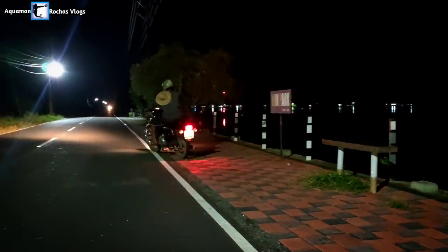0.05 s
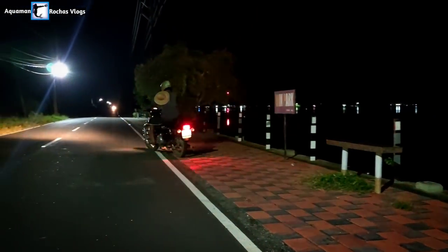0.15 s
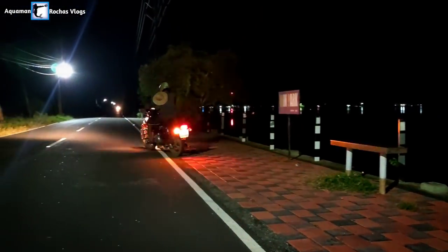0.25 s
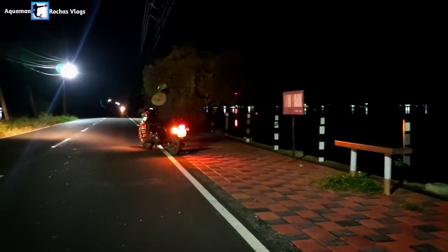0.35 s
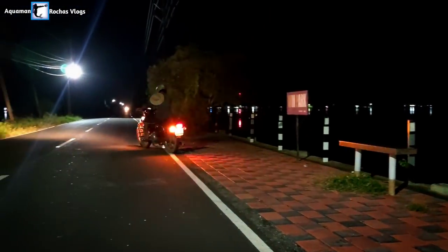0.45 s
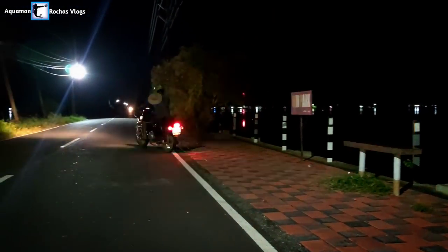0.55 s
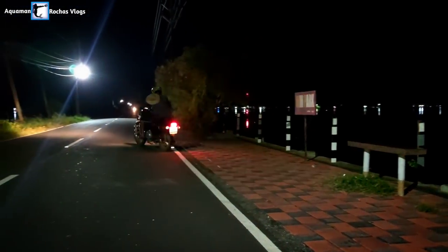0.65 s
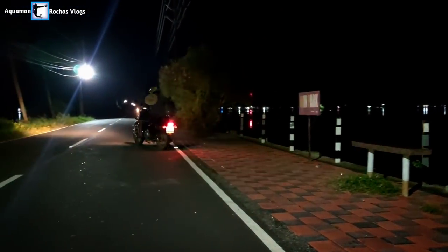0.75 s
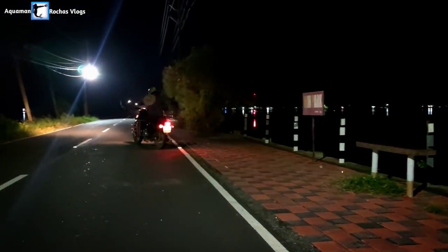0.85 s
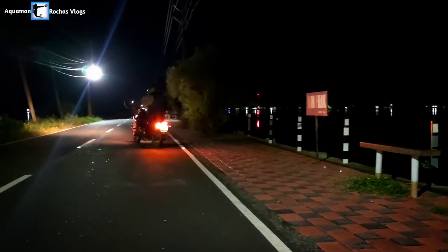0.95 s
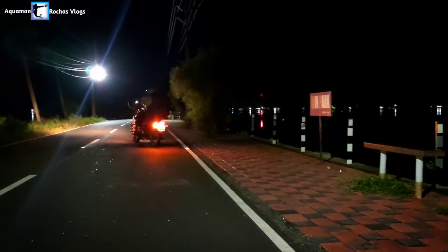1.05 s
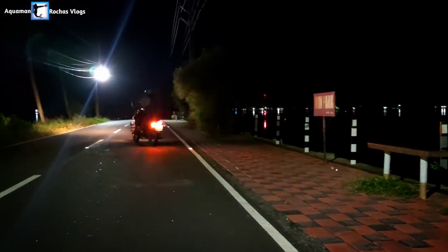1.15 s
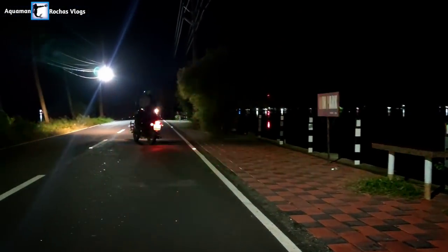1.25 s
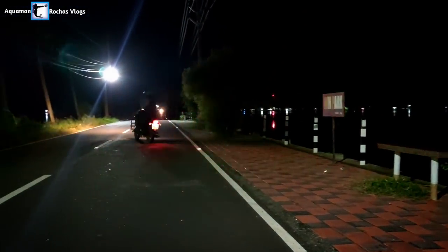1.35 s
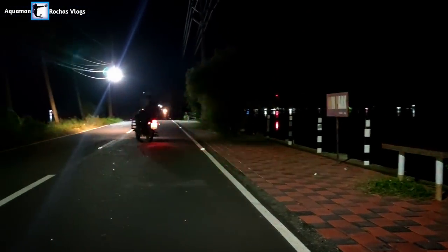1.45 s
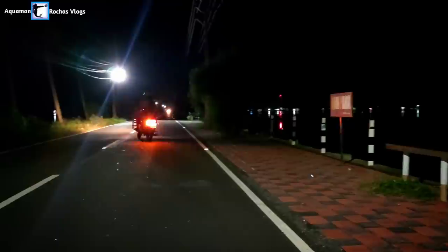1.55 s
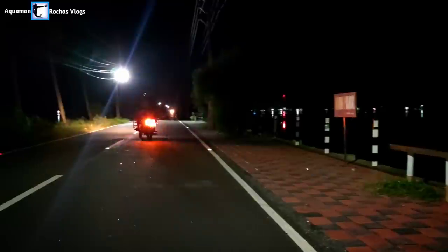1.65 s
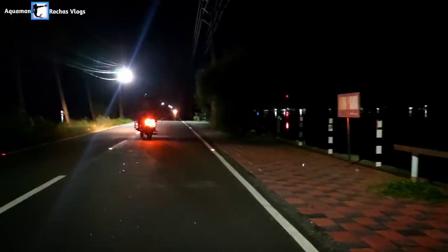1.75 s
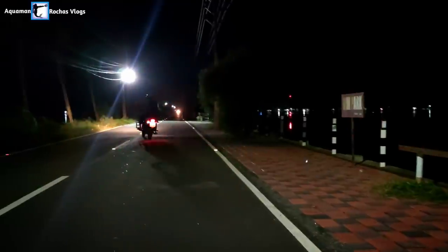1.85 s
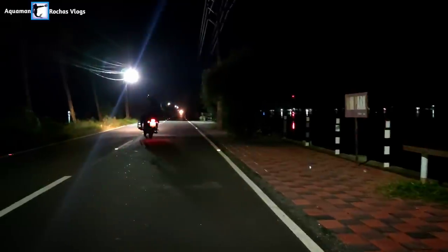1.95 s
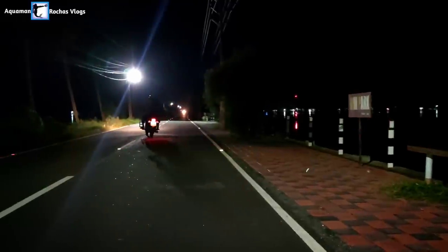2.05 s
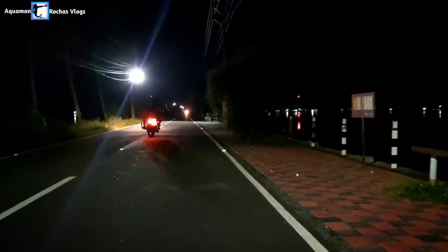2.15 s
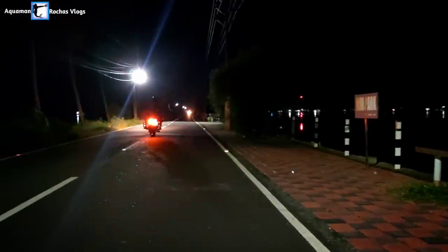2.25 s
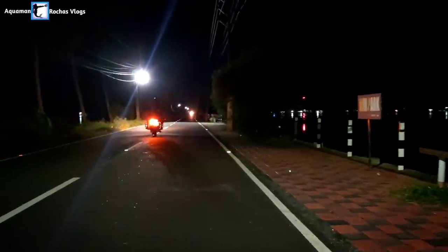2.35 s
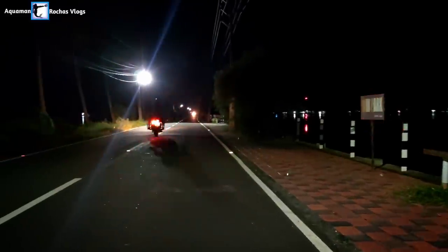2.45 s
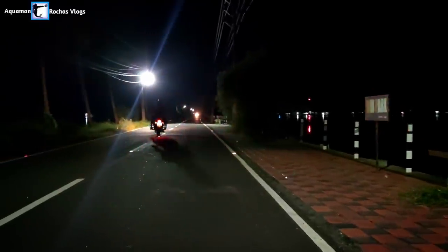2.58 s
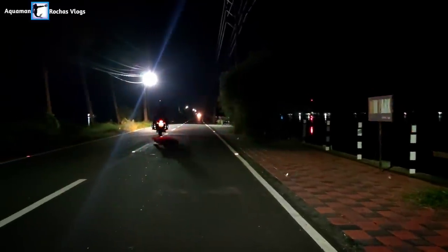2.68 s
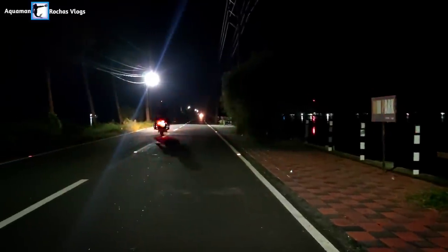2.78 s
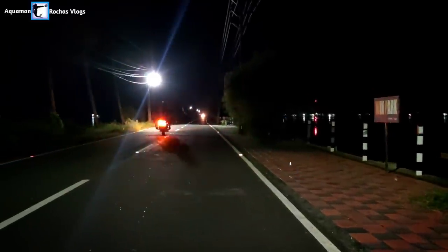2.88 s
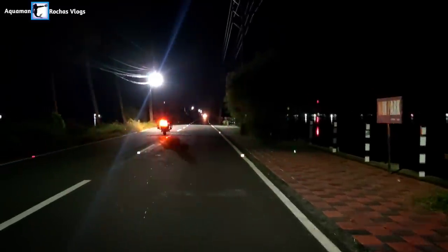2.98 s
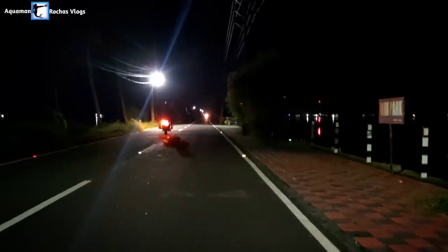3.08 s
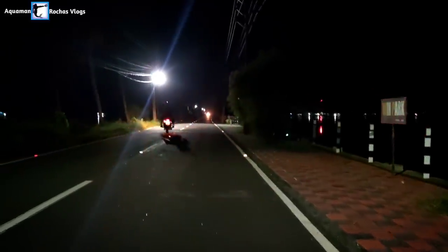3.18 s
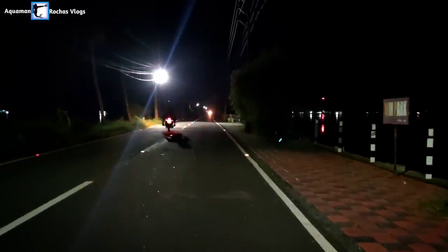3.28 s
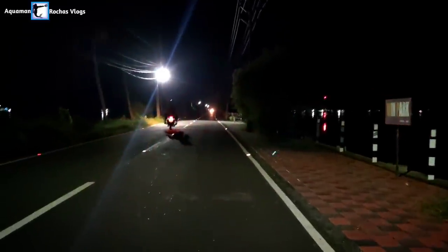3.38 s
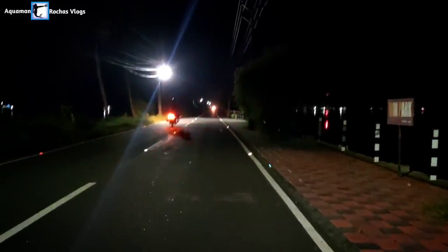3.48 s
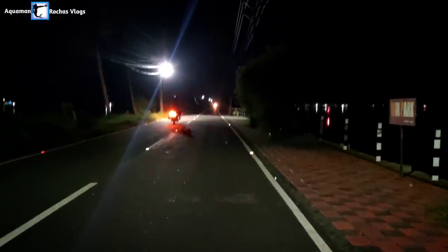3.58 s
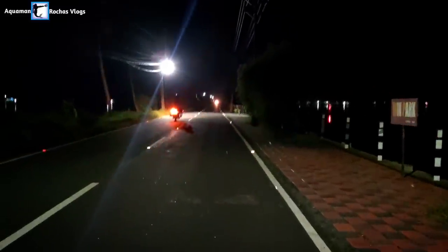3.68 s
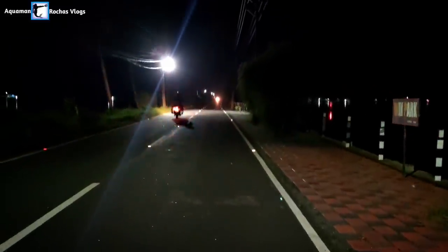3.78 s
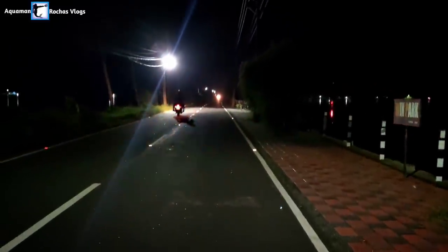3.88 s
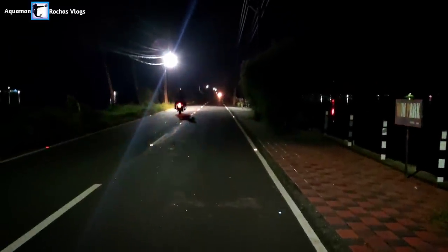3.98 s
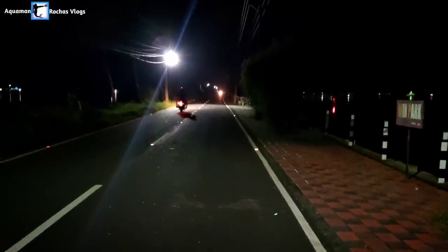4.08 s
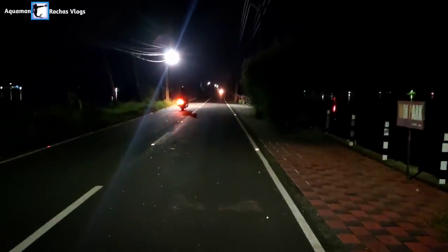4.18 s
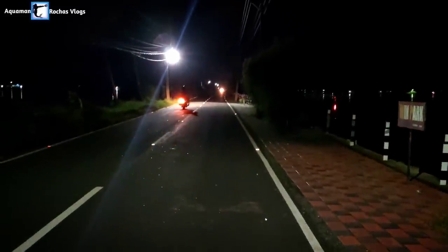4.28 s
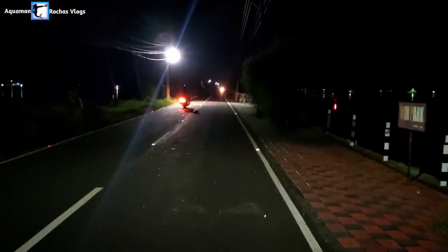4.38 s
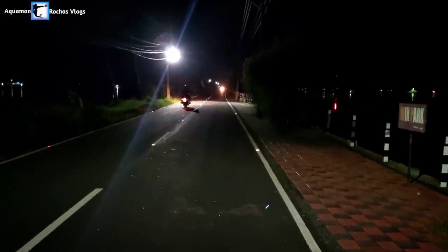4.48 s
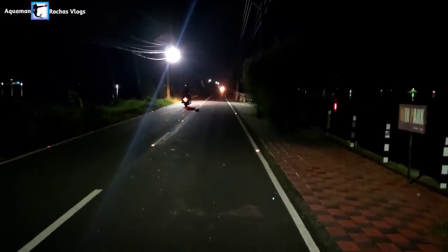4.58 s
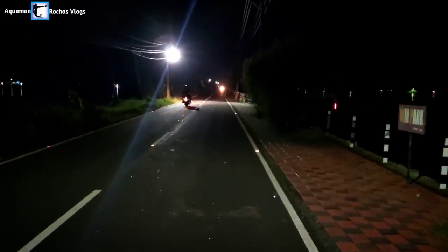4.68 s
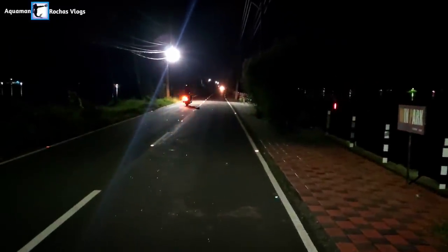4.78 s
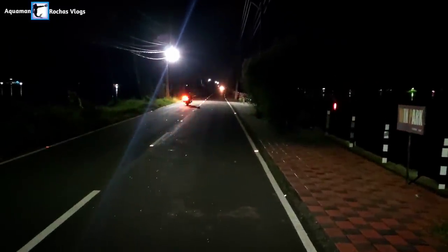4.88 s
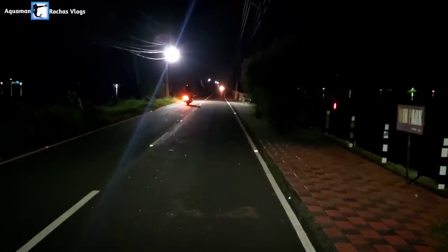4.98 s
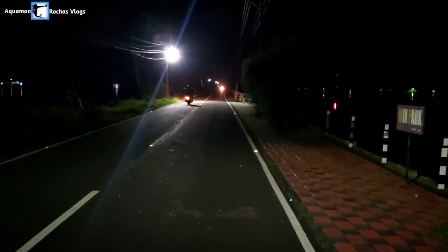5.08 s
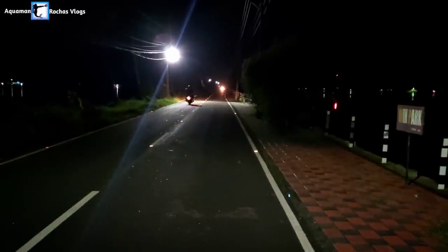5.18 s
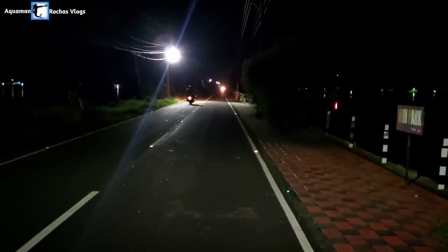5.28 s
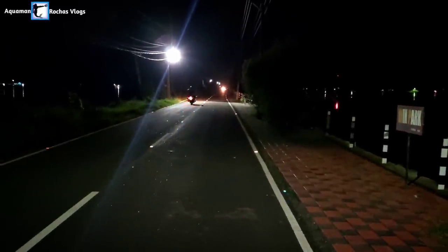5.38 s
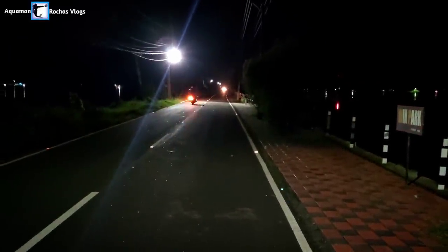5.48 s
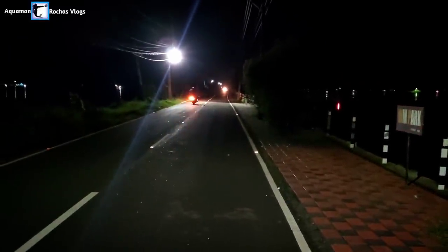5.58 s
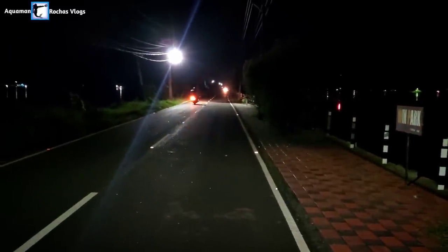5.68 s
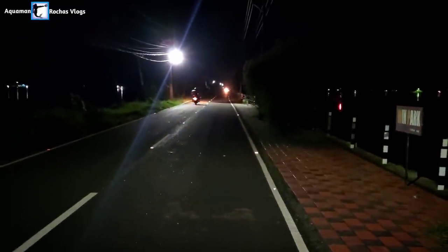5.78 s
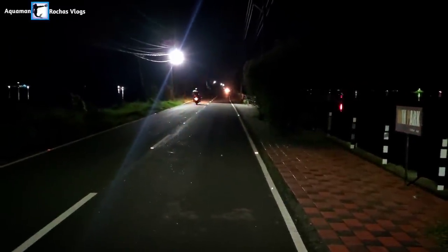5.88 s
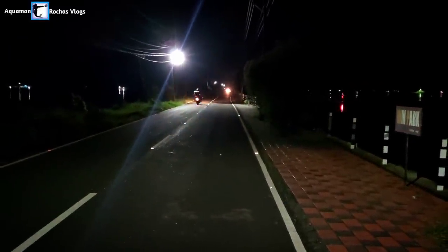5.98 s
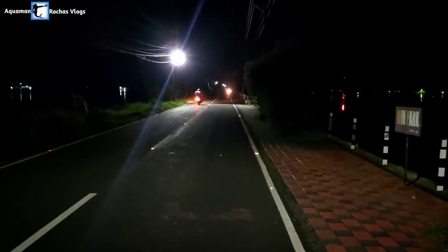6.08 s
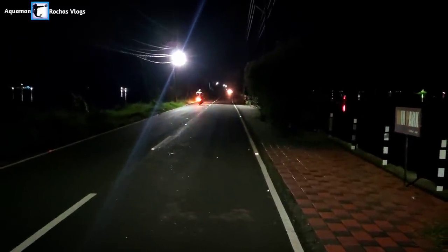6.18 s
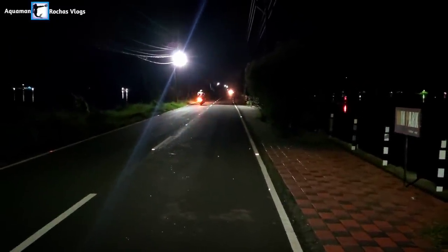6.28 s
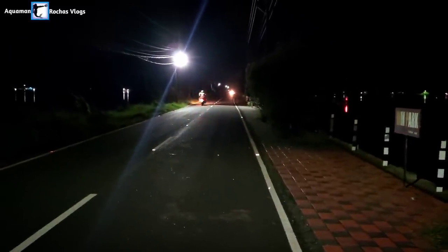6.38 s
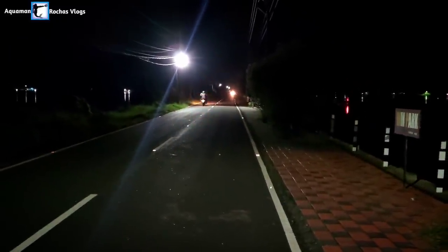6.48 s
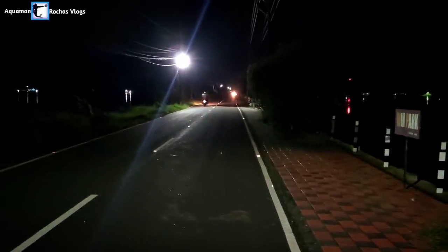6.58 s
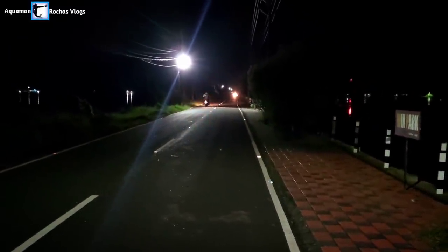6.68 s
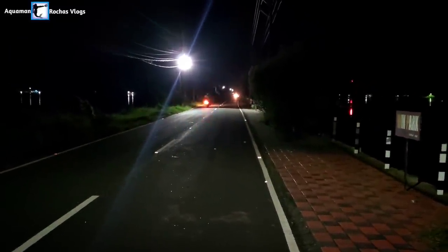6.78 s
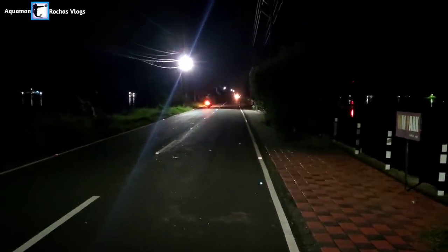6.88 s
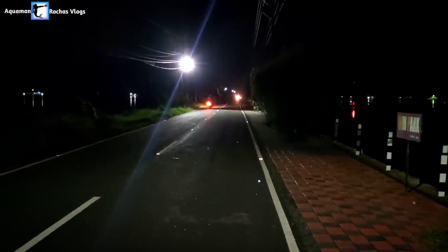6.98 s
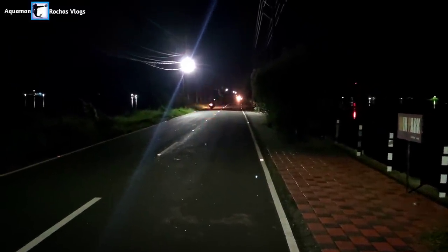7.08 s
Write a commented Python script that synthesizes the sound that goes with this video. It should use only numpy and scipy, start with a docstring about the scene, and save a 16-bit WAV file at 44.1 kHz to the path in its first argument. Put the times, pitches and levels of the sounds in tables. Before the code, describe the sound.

Crickets chirp in the night air as a motorcycle rides off with a deep, pulsing exhaust, dipping at two gear changes.

```python
"""A single-cylinder motorcycle pulls away on a night road, changes up twice and fades into the distance.
Its exhaust is a pulse train: each firing thumps the silencer, excites the pipe's resonances in a bark
and releases a chuff of turbulent gas. The sound spreads spherically and scatters from roadside trees.
Close by on the left a bush cricket chirps, one falling whistle to a wing stroke, over far insects
and a low rumble of air."""
import sys
import numpy as np
from scipy import signal
from scipy.fft import rfft, irfft
from scipy.io import wavfile

SR = 44100
rng = np.random.default_rng(int(sys.argv[2]) if len(sys.argv) > 2 else 0)


def generate_wav(signal):
    """Clip the signal to [-1, 1] and save it as 16-bit WAV at the path in sys.argv[1]."""
    frames = np.transpose(np.atleast_2d(signal))
    scaled = np.clip(frames, -1, 1) * 32767
    pcm = np.round(scaled).astype(np.int16)
    wavfile.write(sys.argv[1], SR, pcm)


N = 314874
TIME = np.arange(N) / SR

# one pull per gear: t/s, firing rate/Hz, its linear term/(Hz/s), its quadratic term/(Hz/s^2),
# clutch slip/Hz, opening time/s, throttle/1, thump/dB, bark/dB, chuff/dB, chuff swell/(dB/s)
GEAR_PULLS = [(0.0205, 12.305, 1.79, 1.8, 0, 0, .81, -10.8, -34, -26, 4),
              (2.3744, 12.485, 3.572, -.264, 3.32, .45, .86, -10.2, -30.2, -20.5, -1),
              (5.799, 15.517, -1.34, 1.226, 0, .07, .89, -12.3, -29.5, -33.5, 6.5)]
# gear changes, throttle shut until the next pull: t/s, firing rate/Hz, slowing/(Hz/s)
GEAR_SHIFTS = [(1.7043, 18.271, 5.769), (5.0706, 18.743, 6.377)]
# lean firings that barely catch: t/s, gain/dB
LEAN_FIRINGS = [(1.704, -11.5), (2.179, -3), (5.071, -9), (5.471, -1.5)]
# firings that crack harder or softer than their neighbours: t/s, chuff gain/dB
CHUFF_ACCENTS = [(0.261, 2.5), (0.413, 4), (0.839, 2), (0.905, 5), (0.969, 2), (1.156, 2), (1.495, 6),
                 (1.598, -1), (2.955, 1), (3.721, 4), (3.954, 3.5), (4.291, 2.5), (4.866, 1), (5.865, 5.5),
                 (7.04, 4.5), (7.104, 5)]
# silencer response under load: f/Hz, level/dB
SILENCER_LOADED = [(25, -25), (47, -33), (64, -2), (75, 1), (105, 1), (126, 4.5), (150, -8), (195, -1.5),
                   (264, 1.5), (287, -18), (350, -14), (445, -27), (700, -30.5), (2000, -119)]
# silencer response with the throttle shut: f/Hz, level/dB
SILENCER_COASTING = [(25, -29), (45, 16), (65, 13), (100, -4.5), (160, -12.5), (220, -27), (300, -34),
                     (450, -34.5), (800, -70), (2000, -106)]
# exhaust pipe resonances: f/Hz, bandwidth/Hz, level/dB, gain per doubling of distance/dB
PIPE_MODES = [(497, 65, -6.5, -3), (686, 190, 0, 1.5), (837, 85, -1, -3.5), (1135, 190, -7.5, -8.5),
              (1401, 64, -14, -5)]
# pipe modes that ring on, at cruising revs: f/Hz, level relative to the bark/dB, time constant/s
RINGING_MODES = [(531.2, -3.5, 0.012), (670, -10.5, 0.014), (847, -13, 0.013)]
# bands of the exhaust's hiss as the left and right microphones colour it: f/Hz, bandwidth/Hz,
# left level/dB, right level/dB, gain per doubling of distance/dB, gain with the pipe aimed at them/dB
CHUFF_BANDS = [(1067, 546, -11.5, -10, -1.5, -8.5), (1972, 350, -14.5, -27, 3, -2.5),
               (2400, 310, -12, -10, -3, -14), (2940, 380, -29, -8, -0.5, -14.5),
               (3510, 570, -21.5, -17.5, 7, -26), (4215, 450, -19, -9.5, 4.5, 1.5),
               (5320, 1180, -19, -15.5, 7.5, 11.5), (6260, 810, -31, -12.5, 4.5, 14.5),
               (7020, 1200, -11, -20, 3, 14.5), (7870, 560, 1, -42, -3, -3),
               (10200, 3500, -25, -7, -11, -17), (13350, 6100, -47, -4.5, -9.5, -10.5)]
# spectrum of tyres, chain and engine clatter: f/Hz, relative level/dB
ROLLING_SPECTRUM = [(100, 19.5), (400, 5), (850, 7.5), (1500, -6), (2400, -3), (4000, -9.5), (7000, -9),
                    (14000, -38)]
# chirps of the near cricket: t/s, number of wing strokes, stroke rate/Hz, level/dB
CRICKET_CHIRPS = [(0.028, 2, 23, -27), (0.632, 6, 23, -21), (1.48, 7, 23, -21), (1.836, 4, 22.5, -29),
                  (2.337, 6, 22.4, -20), (3.166, 6, 23, -24), (4.002, 6, 22.7, -19), (4.832, 7, 22.7, -20),
                  (5.697, 7, 22.9, -16.5), (6.564, 6, 22.7, -18)]
# one wing stroke: t/s from its loudest moment, f/Hz, level/dB
WING_STROKE = [(-.012, 8480, -30), (-.005, 8470, -4), (0, 8420, 1), (.004, 8330, -2), (.008, 8130, -12),
               (.014, 7800, -18), (.02, 7480, -36)]
# course of the thin, high insect hiss: t/s, level/dB
HISS_LEVELS = [(0, -48), (1.8, -47.5), (2.5, -47.5), (4.7, -52), (5.0, -48.5), (5.48, -52), (5.56, -55),
               (7.14, -52.5)]
# faint ticks and scuffs: t/s, f/Hz, bandwidth/Hz, half-length/s, level/dB
FAINT_TICKS = [(4.15, 3090, 1200, 0.0026, -39), (5.416, 1870, 585, 0.0053, -44),
               (6.099, 2240, 1850, 0.027, -43.5)]
# spectrum of air and far insects on the left: f/Hz, relative level/dB
NIGHT_SPECTRUM_LEFT = [(25, -3), (60, -10.5), (250, -30), (800, -30), (1200, -29.5), (2100, -29),
                       (2900, -78), (6600, -51), (7700, -14), (8500, -8), (9300, -34), (10500, -51),
                       (15500, -63)]
# the same on the right: f/Hz, relative level/dB
NIGHT_SPECTRUM_RIGHT = [(25, -10), (60, 0.5), (250, -3.5), (800, -26), (1200, -38), (2900, -38.5),
                        (5500, -33), (7100, -27), (8500, -44), (10200, -53), (15500, -52)]

CRUISE_HZ, HEAT_EXPONENT = 15.42, 0.16   # hotter gas at higher firing rates lifts the exhaust's notes
START_M, START_M_PER_S, ACCELERATION_M_PER_S2 = 11.2, 1.43, 1.865
OPENING_THUMP_DB, OPENING_CHUFF_DB, OPENING_THROTTLE = -3, -13, 0.16   # deficit as the throttle opens
THUMP_SWELL_DB_PER_S, BARK_SWELL_DB_PER_S = 0.96, 4.5   # the engine works harder as a pull goes on
COAST_THUMP_DB, COAST_BARK_DB, COAST_CHUFF_DB, COAST_THROTTLE = -9.5, -26, -37.5, 0.41
COAST_THUMP_DB_PER_S, COAST_GAS_DB_PER_S = -20.5, -19.5
PULSE_GAIN = np.sqrt(.03 * SR)   # gives a unit-energy pulse unit rms over 30 ms


def motorcycle():
    """Superposition: the exhaust's parts share one pulse train; rolling noise and echoes add to them."""
    times, rate, throttle, thump_db, bark_db, chuff_db = ride()
    distance = distance_at(times)
    heat = (rate / CRUISE_HZ) ** HEAT_EXPONENT
    # the pressure starts to swell just before the gas cracks out
    exhaust = thump(times - .0016, thump_db, throttle, distance, rate, heat)
    exhaust = exhaust + bark(times, bark_db, throttle, distance)
    exhaust += chuff(times - .0006, chuff_db, distance)
    bike = exhaust + rolling(times, rate) + tree_echoes(exhaust, distance_at(TIME))
    bike += sizzle(times, chuff_db) + drone(times, bark_db, throttle, distance, heat)
    bike[1] = np.interp(TIME - 3 / SR, TIME, bike[1])   # the path to the right is a little longer
    return bike


def ride():
    """The pulse train after spreading loss: time, rate, throttle, and dB of thump, bark and chuff."""
    columns = np.hstack([pull(*row) for row in GEAR_PULLS] + [shift(*row) for row in GEAR_SHIFTS])
    times, rate, throttle, *levels = columns[:, np.argsort(columns[0])]
    thump_db, bark_db, chuff_db = levels + spreading_db(distance_at(times))
    lean_db, hard_db = accents(LEAN_FIRINGS, times), accents(CHUFF_ACCENTS, times)
    return (times, rate, throttle,
            thump_db + lean_db, bark_db + lean_db / 2, chuff_db + lean_db / 2 + hard_db)


def pull(start, first_rate, speed_up, curvature, slip, opening_s, throttle,
         thump_db, bark_db, chuff_db, swell_db, clutch_s=.05):
    """Firings under load: clutch friction drags the revs to road speed, then the effort climbs."""
    age = time_in_phase(start)
    rate = first_rate + speed_up * age + curvature * age ** 2 + slip * np.exp(-age / clutch_s)
    age, rate = firings(age, rate)
    shut = np.maximum(opening_s - age, 0) / (opening_s + 1e-9)
    return [start + age, rate, throttle - OPENING_THROTTLE * shut,
            thump_db + THUMP_SWELL_DB_PER_S * age + OPENING_THUMP_DB * shut,
            bark_db + BARK_SWELL_DB_PER_S * age,
            chuff_db + swell_db * age + OPENING_CHUFF_DB * shut]


def shift(start, first_rate, slowing, closing_throttle=0.33, closing_s=0.0083):
    """Exponential decay: the throttle snaps shut, the revs sag and the firings die to a putter."""
    age = time_in_phase(start)
    age, rate = firings(age, first_rate - slowing * age)
    throttle = COAST_THROTTLE + closing_throttle * np.exp(-age / closing_s)
    gas_db = COAST_GAS_DB_PER_S * age
    return [start + age, rate, throttle,
            COAST_THUMP_DB + COAST_THUMP_DB_PER_S * age, COAST_BARK_DB + gas_db, COAST_CHUFF_DB + gas_db]


def time_in_phase(start):
    """Local time of a pull or gear change, ending just before the next one."""
    end = min([row[0] for row in GEAR_PULLS + GEAR_SHIFTS if row[0] > start] + [N / SR])
    return np.arange(0, end - start - .025, 1 / SR)


def firings(age, rate):
    """Phase is the integral of rate: age and rate each time a whole cycle opens the exhaust valve."""
    cycles = (np.cumsum(rate) - rate[0]) / SR
    at = np.searchsorted(cycles, np.arange(int(cycles[-1]) + 1))
    return age[at], rate[at]


def accents(rows, times):
    """Uneven combustion: gain in dB for the listed firings, 0 for the others."""
    return sum(db * (abs(times - s) < .025) for s, db in rows)


def scatter(times, spread_db):
    """Cycle-to-cycle variation: a Gaussian level offset for each firing."""
    return spread_db * rng.standard_normal(len(times))


def distance_at(t):
    """Uniform acceleration straight away from the listener; distance in metres."""
    return START_M + START_M_PER_S * t + ACCELERATION_M_PER_S2 * t ** 2 / 2


def spreading_db(distance, reference_m=12):
    """Spherical spreading: sound pressure falls as one over distance."""
    return 20 * np.log10(reference_m / distance)


def thump(times, thump_db, throttle, distance, rate, heat, size=8192):
    """Impulse response of the silencer to each blowdown: hard under load, a soft boom when coasting."""
    hz = np.fft.rfftfreq(size, 1 / SR) + 1
    load = np.clip(throttle, 0, 1)[:, None]
    loaded_db = at_hz(SILENCER_LOADED, hz / heat[:, None])
    coasting_db = at_hz(SILENCER_COASTING, hz)
    # the deep bass thins with distance and revs
    tilt_db_per_octave = 0.7 * np.log2(distance / 14) + 3.0 * np.log2(rate / CRUISE_HZ)
    thinning_db = tilt_db_per_octave[:, None] * np.log2(np.clip(hz, 60, 280) / 100)
    blows = minimum_phase(load * loaded_db + (1 - load) * coasting_db + thinning_db)
    gains = from_db(thump_db + scatter(times, .4)) * PULSE_GAIN
    out = np.zeros(N + size)
    for at, gain, blow in zip((times * SR).astype(int), gains, blows):
        out[at:at + size] += gain * blow
    return out[:N]


def bark(times, bark_db, throttle, distance, front_gain=0.34, turbulence_gain=0.33):
    """Pipe resonance, driven by the pulse front (steep only under load) and the turbulence behind it."""
    gas = gas_burst(crack_s=0.015, tail_s=0.018, tail_share=0.88, rise_s=0.0028)
    steepness_db = -12 * (1 - np.clip(throttle, 0, 1))
    doublings = np.log2(np.minimum(distance, 40) / 22)
    out = 0
    for hz, width, db, carry_db in PIPE_MODES:
        level = bark_db + db + scatter(times, 0.21) + carry_db * doublings
        front = front_gain * pulse_train(times, level + steepness_db, [1.])
        turbulence = turbulence_gain * pulse_train(times, level, gas) * stereo_noise(0.21)
        ringing = resonate(front + turbulence, hz, width)
        out += bandpass(ringing, hz / 1.2, hz * 1.2, order=1)   # deepens the valleys between modes
    return out


def chuff(times, chuff_db, distance, pull_out_s=1.34, crack_db=-8):
    """Turbulence: each gas burst cracks, then hisses. The port resonances of the left and right
    microphones colour the hiss; the colour also shifts with the pipe's aim and with distance."""
    gas = gas_burst(crack_s=0.0011, tail_s=0.011, tail_share=0.17)
    force_db = chuff_db + scatter(times, 1.0)
    aimed = np.maximum(1 - times / pull_out_s, 0)   # the pipe swings away as the bike joins the road
    doublings = np.log2(np.minimum(distance, 30) / 12)
    hiss = 0
    for hz, width, left_db, right_db, carry_db, aimed_db in CHUFF_BANDS:
        level = force_db + aimed_db * aimed + scatter(times, 2.5) + carry_db * doublings
        bursts = pulse_train(times, level, gas) * stereo_noise(0.49)
        hiss += from_db([[left_db], [right_db]]) * resonate(bursts, hz, width, order=2)
    snap = gas_burst(crack_s=0.00038, tail_s=0.0063, tail_share=0.011)
    crack = pulse_train(times + 0.00019, force_db + crack_db, snap) * rng.standard_normal(N)
    return hiss + 2 * bandpass(crack, 2200, 7800) * from_db([[-4], [0]])


def gas_burst(crack_s, tail_s, tail_share, rise_s=0.00097):
    """Unit-energy envelope of escaping gas: a crack as the valve lifts, then an exponential tail."""
    t = np.arange(SR // 12) / SR
    rise = 1 - np.exp(-(t / rise_s) ** 2)
    shape = rise * (np.exp(-t / crack_s) + tail_share * np.exp(-t / tail_s))
    return shape / np.linalg.norm(shape)


def drone(times, bark_db, throttle, distance, heat, carry_db=11):
    """Damped oscillation: the pipe's low modes ring on, clearest afar under load, rising with heat."""
    nearness_db = carry_db * np.minimum(np.log2(distance / 28), 0)
    level = bark_db + nearness_db - 15 * (1 - np.clip(throttle, 0, 1))
    t = np.arange(SR // 8) / SR
    out = np.zeros(N + SR)
    for at, db, lift in zip((times * SR).astype(int), level, heat):
        for hz, note_db, ring_s in RINGING_MODES:
            note = t * np.exp(-t / ring_s) * np.sin(2 * np.pi * hz * lift * t)
            out[at:at + len(t)] += from_db(db + note_db) * PULSE_GAIN * note / np.linalg.norm(note)
    return out[:N]


def sizzle(times, chuff_db, trail_db=-14):
    """Narrow-band gas noise decays slowly and lingers between the firings."""
    trail = pulse_train(times, chuff_db + trail_db, gas_burst(crack_s=0.11, tail_s=0.11, tail_share=1.0))
    return resonate(trail * stereo_noise(.5), hz=6350, width=1000, order=2) * from_db([[-5], [0]])


def rolling(times, rate, cruise_db=-35, db_per_octave=7):
    """Broadband noise of tyres, chain and engine clatter grows with revs and falls by spreading."""
    noise = unit_rms(colour(stereo_noise(.5), ROLLING_SPECTRUM))
    octaves = np.log2(np.interp(TIME, times, rate) / CRUISE_HZ)
    return from_db(cruise_db + db_per_octave * octaves + spreading_db(distance_at(TIME))) * noise


def tree_echoes(exhaust, distance, send_db=-17, db_per_doubling=1.5, t60_s=0.52):
    """Scattering by roadside trees: the echoes gain on the direct sound as the bike recedes."""
    t = np.arange(SR) / SR
    mid, side = rng.standard_normal((2, SR)) * from_db(-60 * t / t60_s) * (1 - np.exp(-t / 0.004))
    echoes = mid + 0.028 * side * np.array([[1], [-1]])
    echoes = bandpass(echoes / np.linalg.norm(echoes[0]), 300, 4000)
    sent = exhaust * from_db(send_db + db_per_doubling * np.log2(distance / 4))
    return signal.fftconvolve(sent, echoes, axes=1)[:, :N]


def cricket(chirps, pitch=1):
    """Stridulation: each wing stroke is a falling whistle; the first of a chirp is weaker and lower."""
    out = np.zeros(N + SR)
    t = np.arange(WING_STROKE[0][0], WING_STROKE[-1][0], 1 / SR)
    hz, shape_db = curve_at(WING_STROKE, t)
    for start, count, rate, db in chirps:
        for k, (loud, tune) in enumerate(rng.standard_normal((round(count), 2))):
            at = max(0, int((start + k / rate + t[0]) * SR))
            detune = 1 + .002 * tune - .008 * (k == 0)
            phase = 2 * np.pi * np.cumsum(hz * pitch * detune) / SR
            level = db + shape_db + 0.35 * loud - 1.9 * (k == 0)
            out[at:at + len(t)] += from_db(level) * np.sin(phase)
    return out[:N]


def far_crickets(level_db=-36.5, count=5):
    """Independent sources: neighbours of the same kind chirp at their own pitch and pace."""
    out = 0
    for pitch in np.linspace(.97, 1.03, count):
        starts = rng.uniform(0, .8) + np.arange(8) * rng.uniform(.8, .9)
        out += cricket([(s, 6, 22.5, level_db) for s in starts], pitch)
    return out


def verge_insects():
    """Band-limited noise: small insects on the right hiss far above the crickets' pitch."""
    hiss = unit_rms(resonate(rng.standard_normal((2, N)), hz=13500, width=3000, order=2))
    return from_db(curve_at(HISS_LEVELS, TIME)[0]) * hiss * from_db([[-12], [0]])


def night(level_db=-39, apart=0.26):
    """Air rumbles and countless insects hiss; partial decorrelation widens the treble."""
    mid, side = rng.standard_normal((2, N))
    side = apart * signal.sosfilt(signal.butter(1, 900, "high", fs=SR, output="sos"), side)
    left = colour(mid + side, NIGHT_SPECTRUM_LEFT)
    right = colour(mid - side, NIGHT_SPECTRUM_RIGHT)
    return from_db(level_db) * unit_rms(np.array([left, right]))


def ticks():
    """Faint transients: bands of noise under brief Gaussian envelopes."""
    out = 0
    for s, hz, width, half_length_s, db in FAINT_TICKS:
        envelope = from_db(db) * np.exp(-((TIME - s) / half_length_s) ** 2)
        out += envelope * resonate(rng.standard_normal((2, N)), hz, width, order=2)
    return out


def pulse_train(times, db, shape):
    """Convolution puts a unit-energy shape at each time; db is its rms level over 30 ms."""
    clicks = np.zeros(N)
    clicks[(times * SR).astype(int)] = from_db(db) * PULSE_GAIN
    return signal.oaconvolve(clicks, shape)[:N]


def resonate(x, hz, width, order=1):
    """A resonance whose impulse response has about unit energy; order 2 has steeper skirts."""
    low, high = np.clip([hz - width / 2, hz + width / 2], 10, .48 * SR)
    return bandpass(x + 1e-18, low, high, order) * np.sqrt(SR / (2 * width))


def bandpass(x, low_hz, high_hz, order=2):
    """A maximally flat pass band between two half-power frequencies."""
    return signal.sosfilt(signal.butter(order, [low_hz, high_hz], "band", fs=SR, output="sos"), x)


def minimum_phase(db):
    """Causality: folding the cepstrum gives a unit-energy impulse response for each row of gains."""
    cepstrum = irfft(db * np.log(10) / 20)
    half = cepstrum.shape[1] // 2
    cepstrum[:, 1:half] *= 2
    cepstrum[:, half + 1:] = 0
    response = irfft(np.exp(rfft(cepstrum)))
    return response / np.linalg.norm(response, axis=1, keepdims=True)


def stereo_noise(apart):
    """Partial coherence: a common white noise plus an independent share on each side."""
    return rng.standard_normal(N) + apart * rng.standard_normal((2, N))


def colour(x, spectrum):
    """Filtering as multiplication by a spectrum."""
    return irfft(rfft(x) * from_db(at_hz(spectrum, np.fft.rfftfreq(N, 1 / SR) + 1e-3)), N)


def at_hz(spectrum, hz):
    """Levels interpolated on a log-frequency axis."""
    points, db = np.transpose(spectrum)
    return np.interp(np.log(hz), np.log(points), db)


def curve_at(rows, at):
    """The columns of a table, interpolated linearly in time."""
    times, *columns = np.transpose(rows)
    return [np.interp(at, times, column) for column in columns]


def from_db(db):
    """Pressure ratio of a level."""
    return 10 ** (np.asarray(db) / 20)


def unit_rms(x):
    """Normalisation to unit mean power."""
    return x / np.sqrt(np.mean(x ** 2) + 1e-20)


def scene():
    """Superposition of the receding bike, the insects and the night air."""
    bike = motorcycle()
    crickets = (cricket(CRICKET_CHIRPS) + far_crickets()) * from_db([[0], [-19]])
    return bike + crickets + verge_insects() + night() + ticks()


def record(dry, stop_hz=16800):
    """Saturation and band limiting: peaks clip at full scale and a steep low-pass cuts the top."""
    return signal.sosfilt(signal.cheby2(14, 60, stop_hz, fs=SR, output="sos"), np.clip(dry, -1, 1))


dry = scene()
out = record(dry)
generate_wav(out)
```